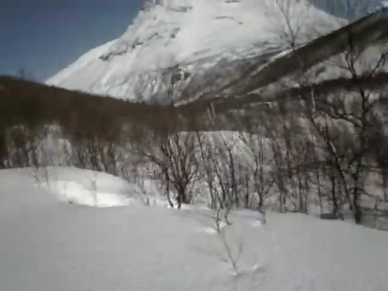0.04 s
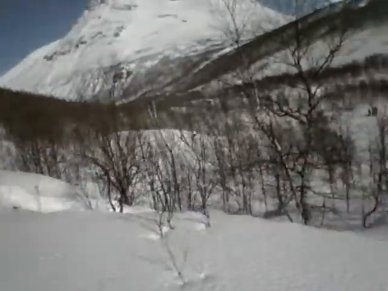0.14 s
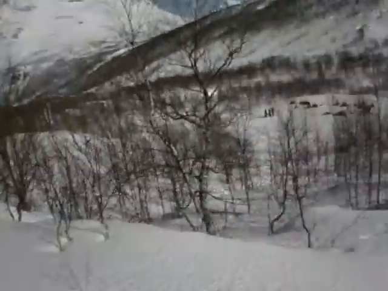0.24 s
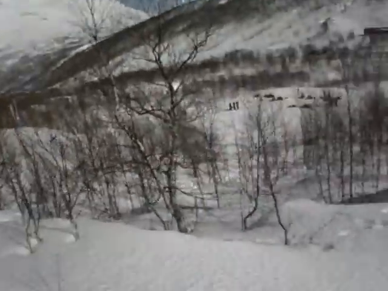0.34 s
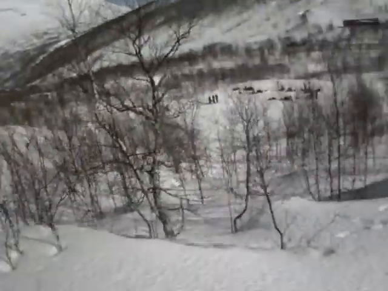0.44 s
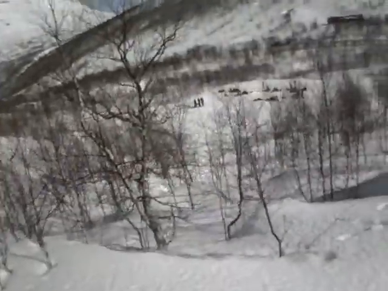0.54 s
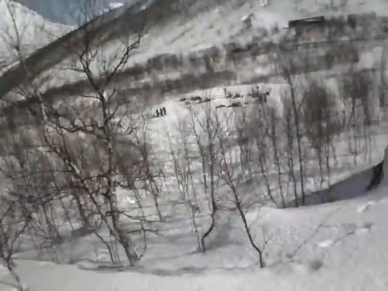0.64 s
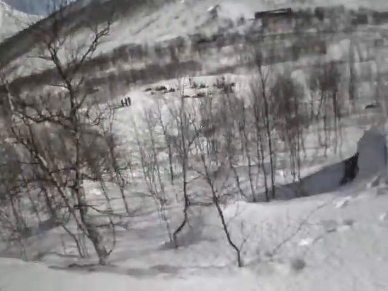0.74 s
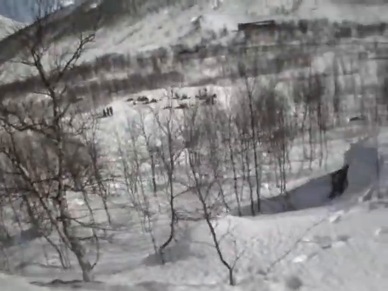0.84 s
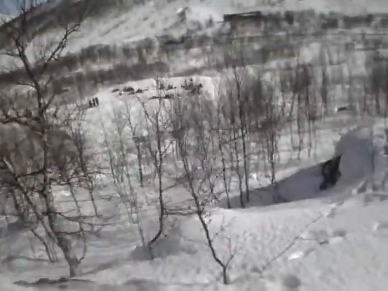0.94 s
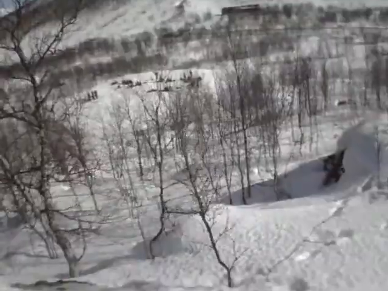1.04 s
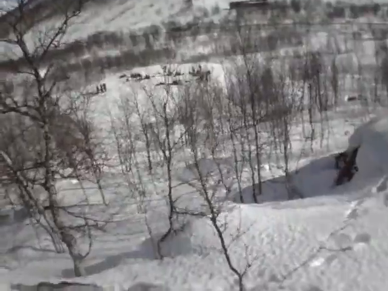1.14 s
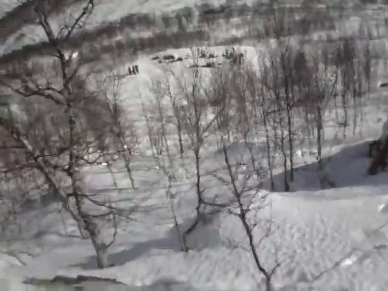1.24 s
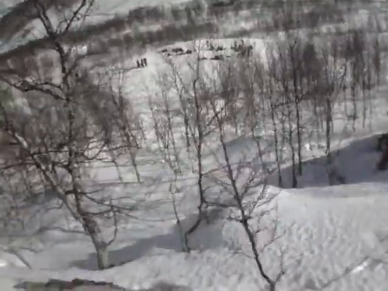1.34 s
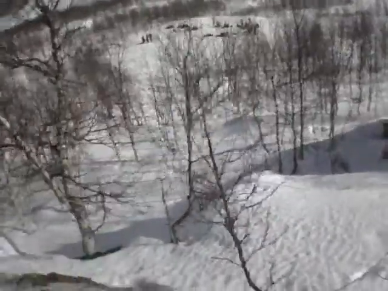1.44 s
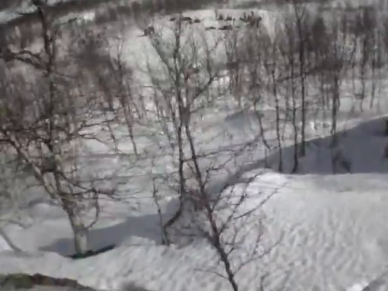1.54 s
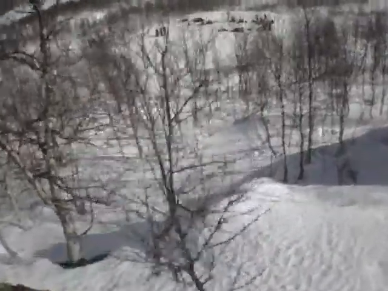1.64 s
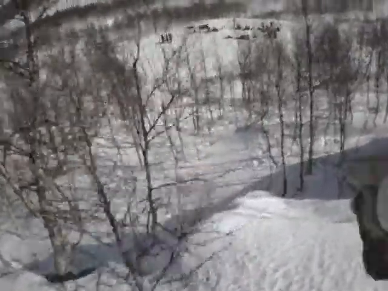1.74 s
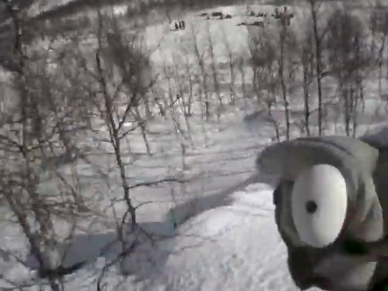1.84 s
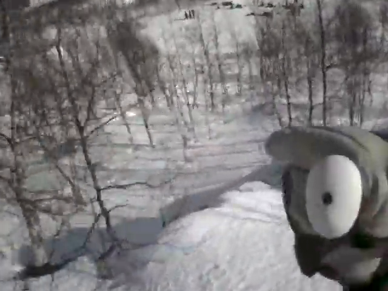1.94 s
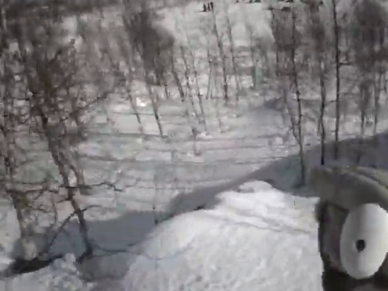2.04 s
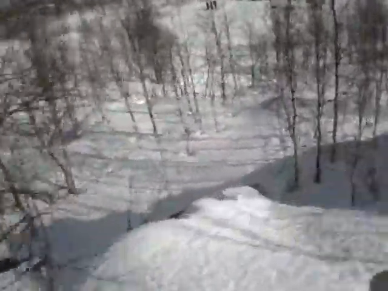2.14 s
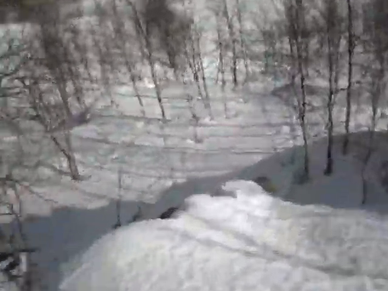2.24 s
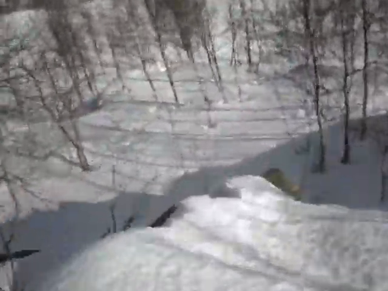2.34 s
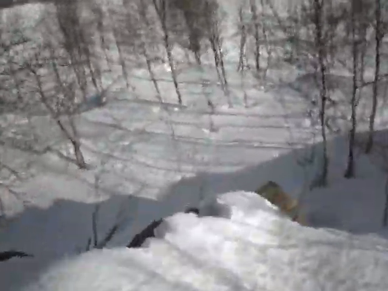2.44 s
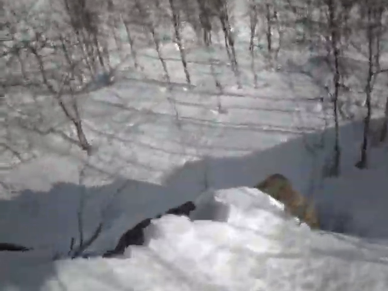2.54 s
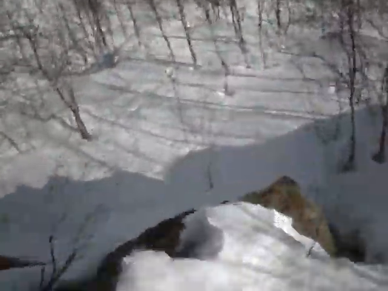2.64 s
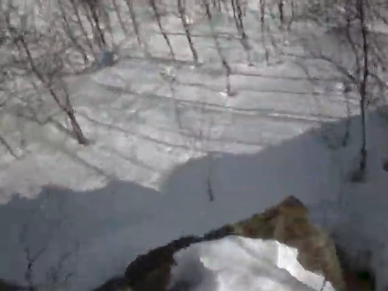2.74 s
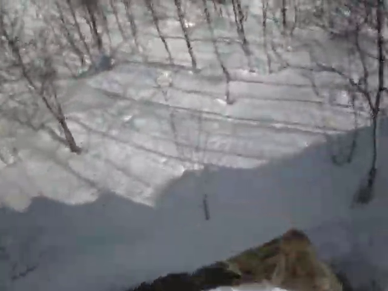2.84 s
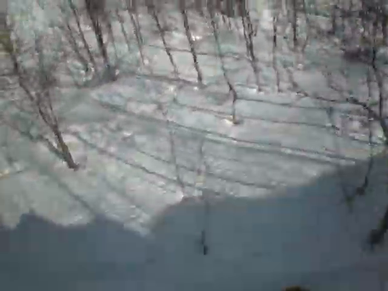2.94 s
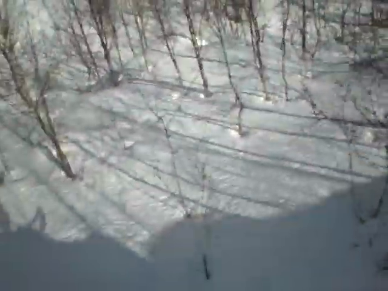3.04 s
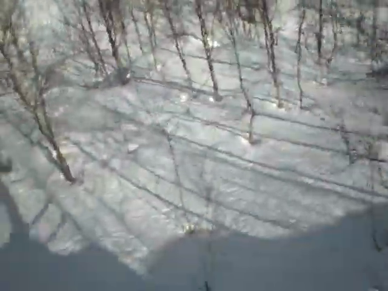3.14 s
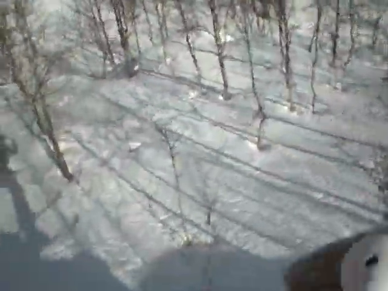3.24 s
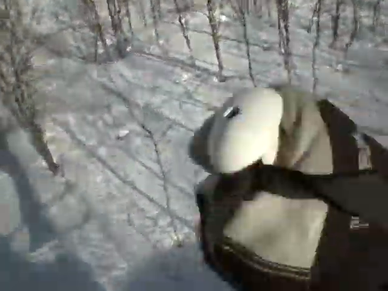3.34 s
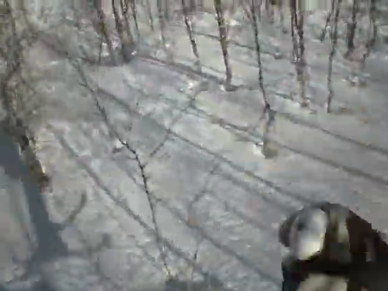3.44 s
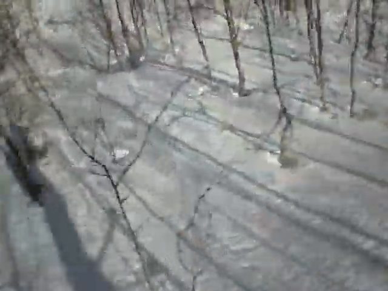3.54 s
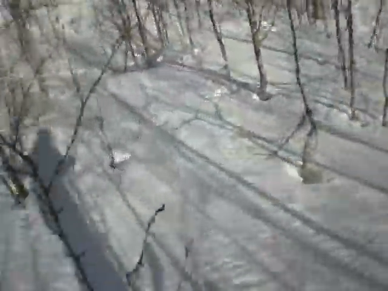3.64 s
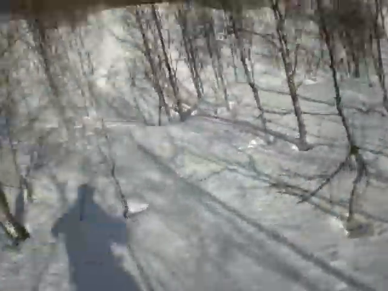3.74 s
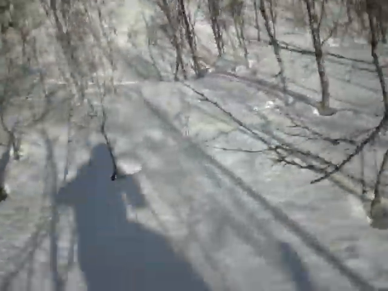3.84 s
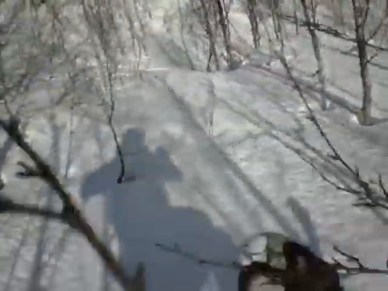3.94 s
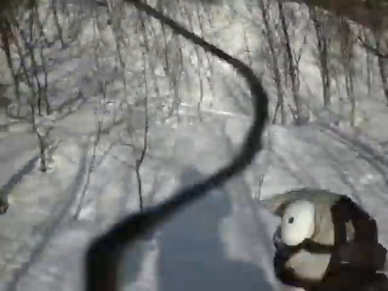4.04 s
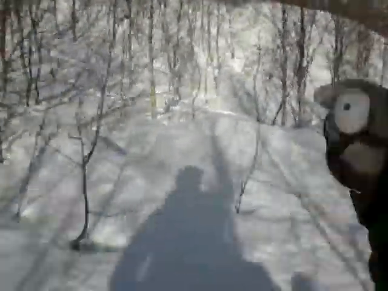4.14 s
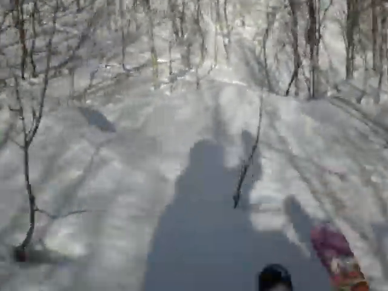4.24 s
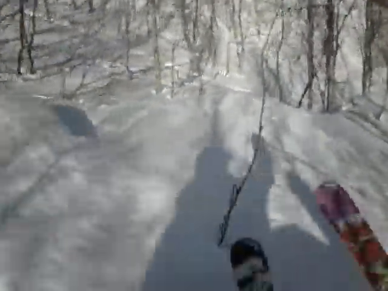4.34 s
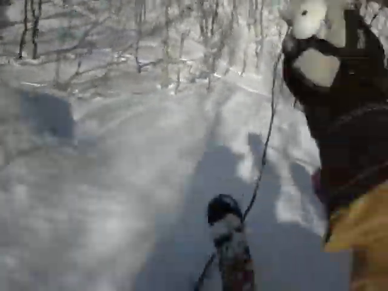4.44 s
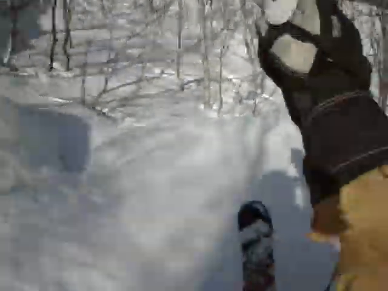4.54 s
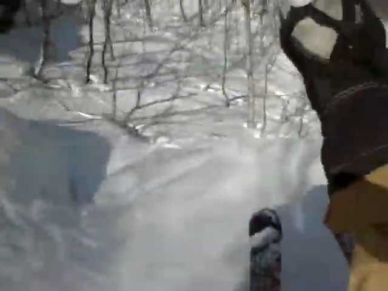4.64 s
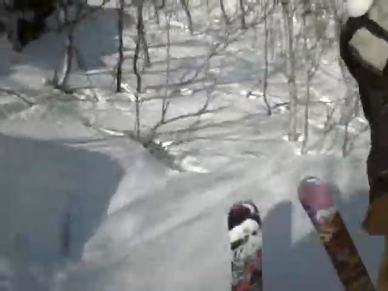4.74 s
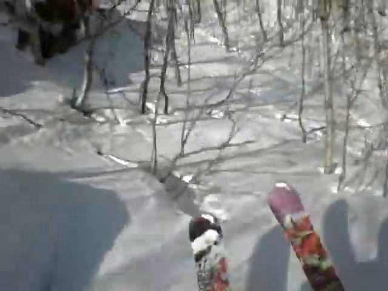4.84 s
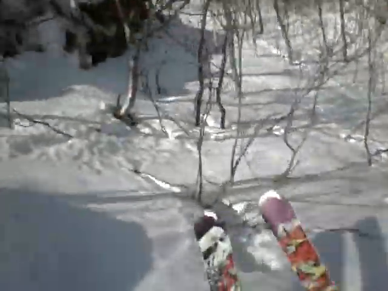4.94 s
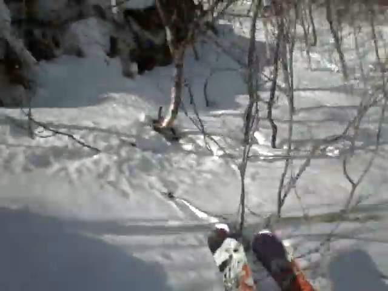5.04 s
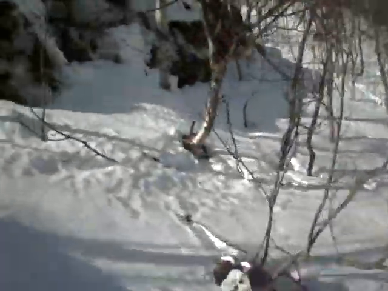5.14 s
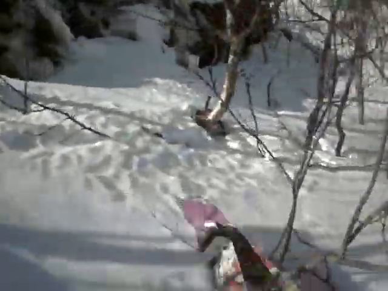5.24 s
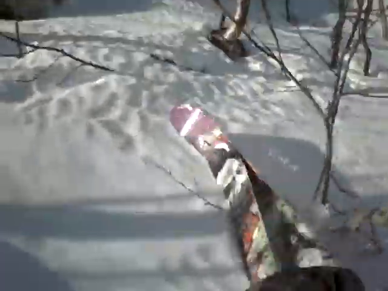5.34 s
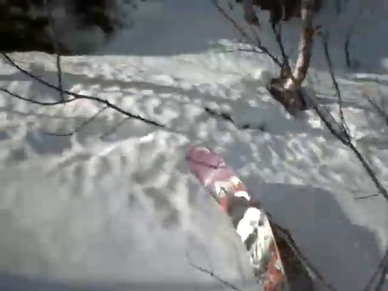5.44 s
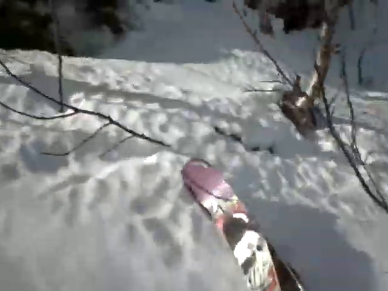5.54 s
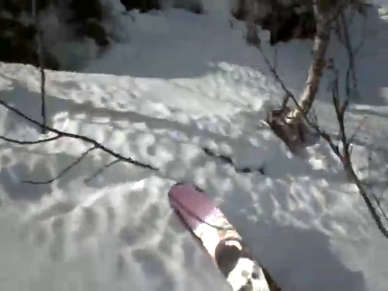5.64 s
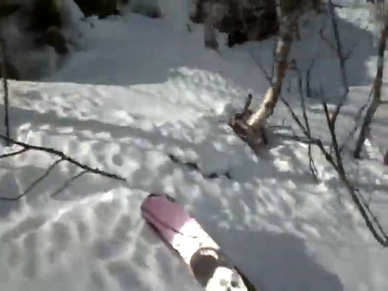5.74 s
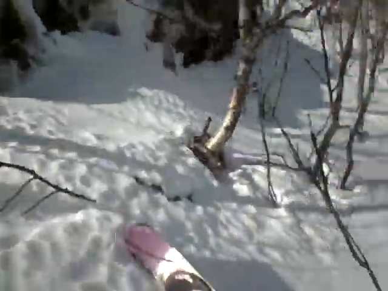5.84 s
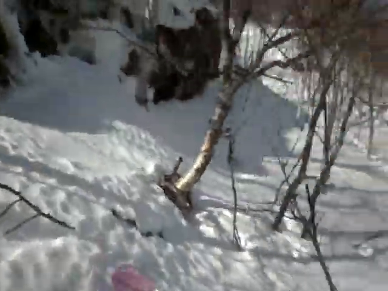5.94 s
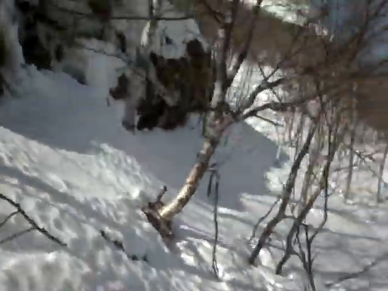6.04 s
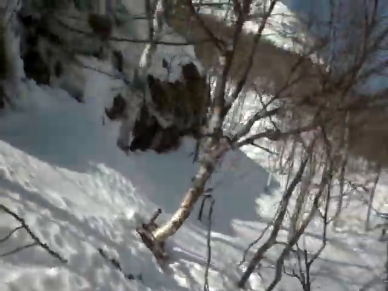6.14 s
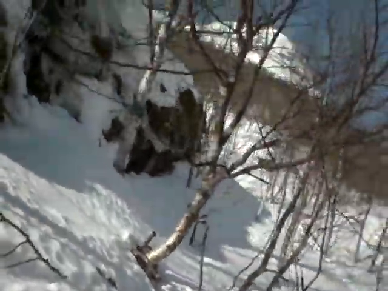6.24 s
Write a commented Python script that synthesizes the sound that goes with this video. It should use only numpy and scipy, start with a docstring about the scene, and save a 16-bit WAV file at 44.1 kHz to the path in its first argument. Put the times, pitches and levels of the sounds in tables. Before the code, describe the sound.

On a snowy slope, a helmet microphone picks up the dull swish and crunch of skis, low wind and small knocks. Speed builds, the edges scrape over a firm lip, and the wind swells into harsh buffeting. The skier slams into the snow, distorting the sound as bindings and edges clack. The skis skid through packing snow and slow to a crawl after one more loud clack.

```python
"""Skis hiss and groan through deep powder as bumps knock the helmet and the gear clacks.
The skier grinds over the lip of a drop off a rock, lands hard and skids to a crawl.
Snow groans as it packs and hisses as it is thrown; wind buffets the closed helmet camera case.
The case muffles all treble; the landing and the strongest gusts overload the microphone."""
import sys
import numpy as np
from scipy import signal
from scipy.fft import rfft, irfft, next_fast_len
from scipy.io import wavfile
from scipy.ndimage import uniform_filter1d, map_coordinates

SR = 44100
rng = np.random.default_rng(int(sys.argv[2]) if len(sys.argv) > 2 else 0)


def wrap_up_sound(samples):
    """Save the sound to the file named by the first command line argument, as 16-bit audio."""
    columns = np.atleast_2d(samples).T
    # keep every value between -1 and 1, then stretch to whole-number steps
    tamed = np.clip(columns, -1, 1)
    steps = np.round(tamed * 32767).astype(np.int16)
    wavfile.write(sys.argv[1], SR, steps)


N = 276934


def amp(db):
    """Decibels to gain."""
    return 10 ** (np.asarray(db) / 20)


def unit(x):
    """Scale to rms 1."""
    return x / np.sqrt(np.mean(x ** 2) + 1e-20)


def curve(rows):
    """One value per sample from (seconds, value) rows."""
    return np.interp(np.arange(N) / SR, *np.transpose(rows))


def wobble(rate):
    """A smooth random curve, rate knots a second."""
    return map_coordinates(rng.standard_normal(int(N * rate / SR) + 4), [np.arange(N) * rate / SR])


def swell(start, length, attack_s, release_t60, arch_db):
    """Envelope of one push: it rises, holds in an arch arch_db lower at both ends, and dies away."""
    t = np.arange(N) / SR - start
    arch = (2 * np.clip(t / length, 0, 1) - 1) ** 2
    release_db = 60 * np.maximum(t - length, 0) / release_t60
    return np.clip(t / attack_s, 0, 1) * amp(-arch_db * arch - release_db)


def filtered(x, response):
    """x through a complex frequency response."""
    size = next_fast_len(len(x) + 8192)
    return irfft(rfft(x, size) * response(np.fft.rfftfreq(size, 1 / SR)), size)[:len(x)]


def eq(x, points):
    """x through (Hz, dB) points joined on a log axis."""
    f, db = np.transpose(points)
    return filtered(x, lambda hz: amp(np.interp(np.log(hz + 1), np.log(f), db)))


def noise(points):
    """Noise at rms 1, coloured by an EQ curve."""
    return unit(eq(rng.standard_normal(N), points))


def add(track, start, sound):
    """Mix a sound into the track at start seconds."""
    part = track[round(start * SR):][:len(sound)]
    part += sound[:len(part)]


def crunch(rate, spread_db, share):
    """Crystals collapse: tiny uneven fractures carry this share of the power, sliding noise the rest."""
    fractures = (rng.random(N) < rate / SR) * rng.choice([-1, 1], N)
    sizes = amp(spread_db * np.clip(rng.standard_normal(N), -2, 2))
    return np.sqrt(share) * unit(fractures * sizes) + np.sqrt(1 - share) * rng.standard_normal(N)


def swish(x, depth_db):
    """Patches a few hundred Hz wide and a few hundredths of a second long swell and sink."""
    spectrum = signal.stft(x, nperseg=512)[2]
    patches = uniform_filter1d(rng.standard_normal(spectrum.shape), size=4, axis=0)
    patches = uniform_filter1d(patches, size=6, axis=1)
    return signal.istft(spectrum * amp(depth_db * unit(patches)), nperseg=512)[1][:N]


# Weight on the gliding skis. Each row: time in seconds, level of the packing snow in dB.
SKI_LOAD = [(0, -32), (.22, -31), (.6, -25), (.82, -23), (1.05, -26.5), (1.25, -18.5), (1.5, -32.5),
            (1.8, -30.5), (1.96, -19), (2.5, -18.5), (2.7, -28), (3.2, -25), (3.52, -12), (3.95, -18),
            (4.25, -12), (4.65, -18.5), (5.3, -16.5), (5.6, -26.5), (6.28, -28)]
# Airflow rises with speed and drives both hiss and wind. Each row: time in seconds, level in dB.
AIRSPEED = [(0, -47), (.42, -40.5), (.68, -30.5), (1.03, -42), (1.27, -30.5), (1.55, -33), (1.86, -31),
            (2.0, -22.5), (2.3, -19.5), (2.52, -32.5), (2.83, -25.5), (3.38, -19), (3.6, -14.5),
            (4.93, -15.5), (5.06, -19.5), (5.35, -20.5), (5.56, -33), (6.28, -34.5)]
# Edges dig in for turns and skids. Each row: start, length and attack in seconds,
# added packing in dB, added thrown snow in dB.
TURNS = [(0.246, 0.031, 0.0061, -29.5, -33), (0.572, 0.21, .05, -30, -33),
         (1.134, 0.35, 0.028, -29.5, -28.5), (2.135, .44, 0.21, -23.5, -18),
         (2.752, 0.066, 0.053, -36, -25.5), (3.698, 0.11, .012, -13.5, -21.5),
         (4.01, 0.16, 0.054, -13, -12.5), (4.289, .17, 0.044, -18.5, -17), (4.74, 0.43, 0.035, -23, -25.5),
         (5.062, 0.21, 0.1, -8.5, -18), (5.322, 0.27, .04, -28.5, -26), (5.769, 0.11, 0.04, -25.5, -25),
         (6.069, 0.37, .03, -39, -31)]
# The skis leave the snow. Each row: start, length and lift-off time in seconds, dip of the hiss in dB.
AIRTIME = [(3.235, 0.22, 0.087, 18.5), (3.453, 0.22, 0.032, 12), (3.869, 0.08, .04, 4),
           (5.665, .035, .008, 13.5)]


def ski_envelopes(glide_db=-32, cruise_db=-25, hiss_growth=0.39, settle_t60=0.096, packing_dip=0.36):
    """Packing follows the load and thrown snow the speed; turns push both up, hops duck both."""
    pack_power = amp(curve(SKI_LOAD)) ** 2
    throw_power = amp(glide_db + hiss_growth * (curve(AIRSPEED) - cruise_db)) ** 2
    for start, length, attack_s, pack_db, throw_db in TURNS:
        edge = swell(start, length, attack_s, release_t60=0.5, arch_db=2.5)
        pack_power += (amp(pack_db) * edge) ** 2
        throw_power += (amp(throw_db) * edge) ** 2
    dip_db = sum(db * swell(start, length, lift_s, settle_t60, arch_db=0)
                 for start, length, lift_s, db in AIRTIME)
    return np.sqrt(pack_power) * amp(-packing_dip * dip_db), np.sqrt(throw_power) * amp(-dip_db)


# The four colours of snow. Each row: frequency in Hz, relative level in dB.
GROAN_EQ = [(60, -26), (170, -6.5), (300, -4), (430, -0.5), (550, 1.5), (660, -1.5), (800, -9), (1000, -16),
            (1120, -22.5), (1260, -18), (1600, -25), (2500, -36), (4000, -46.5)]  # powder packing down
LIP_EQ = [(400, -23.5), (650, 9.5), (780, 0.5), (970, 5), (1100, -21), (2000, -30.5)]  # edges on the firm lip of the drop
SPRAY_EQ = [(500, -31.5), (1100, -17.5), (1300, -12.5), (1680, -8), (2000, 0), (2300, 0), (2520, 1),
            (2720, 1), (2900, 2), (3220, -8.5), (3550, -13), (4300, -18)]  # thrown powder
CRUST_EQ = [(800, -12.5), (1400, -15.5), (1550, -18), (1800, 0.5), (2200, -4), (3000, -0.5), (3500, 0.5),
            (4200, -4)]  # coarse crust scraping the skis
# How much crust is in the hiss. Each row: time in seconds, level against the spray in dB.
CRUST_MIX = [(0, -1), (.3, -13.5), (1.4, -15), (1.7, -3), (2.3, -1.5), (2.7, -7.5), (3.5, -7), (5.5, 3),
             (6.28, -5)]


def snow():
    """Powder groans and sprays and crust rasps, all shaken by ski chatter; the lip grinds once."""
    pack, throw = ski_envelopes()
    lip = amp(-23.5) * swell(start=2.21, length=0.39, attack_s=0.029, release_t60=0.052, arch_db=-1.5)
    chatter = wobble(55)
    groan = eq(crunch(rate=700, spread_db=1.0, share=0.24), GROAN_EQ) * amp(1.9 * chatter)
    grind = eq(crunch(rate=470, spread_db=-3.0, share=0.66), LIP_EQ)
    spray = swish(eq(crunch(rate=1100, spread_db=5.5, share=0.6), SPRAY_EQ), depth_db=2.0)
    rasp = swish(eq(crunch(rate=400, spread_db=2.0, share=0.49), CRUST_EQ), depth_db=2.5)
    hiss = (unit(spray) + amp(curve(CRUST_MIX)) * unit(rasp)) * amp(1.2 * chatter)
    return pack * unit(groan) + lip * unit(grind) + throw * hiss


# Wind on the case, deep and harsh. Each row: frequency in Hz, relative level in dB.
RUMBLE_EQ = [(10, -13), (30, -1), (60, -2.5), (110, -3.5), (160, -5), (300, -10), (550, -15), (1000, -45),
             (2000, -54.5), (4000, -52)]
FLUTTER_EQ = [(100, -0.5), (400, 8.5), (700, -0.5), (1100, -16.5), (2000, -36.5), (4000, -29.5)]
# Single gusts on top of the airflow. Each row: start in seconds, length in seconds, strength in dB.
WIND_GUSTS = [(1.359, 0.051, -25.5), (1.904, 0.13, -18.5), (2.277, 0.17, -21), (3.442, 0.12, -8),
              (3.725, 0.055, -8.5), (4.128, 0.097, -6.5), (4.551, .08, -13.5), (4.711, 0.032, -13)]


def wind(gale_db=-10, flutter_db=-22, flutter_growth=1.7):
    """Gusts and eddies tumble over the case; a harsh flutter grows faster than the rumble."""
    gust_power = sum((amp(db) * swell(start, length, attack_s=0.018, release_t60=0.19, arch_db=3.5)) ** 2
                     for start, length, db in WIND_GUSTS)
    eddies_db = 0.85 * wobble(24)
    buffet_db = 10 * np.log10(amp(curve(AIRSPEED)) ** 2 + gust_power) + eddies_db
    rumble = amp(buffet_db + 1.67) * noise(RUMBLE_EQ)
    flutter = amp(flutter_db + flutter_growth * (buffet_db - gale_db)) * noise(FLUTTER_EQ)
    return rumble + flutter


# The hollow tone of helmet and case. Each row: centre in Hz, width in Hz, relative level in dB.
HELMET_MODES = [(367, 250, -3), (580, 101, 7), (745, 140, 0), (1560, 310, -10), (2560, 1300, -25.5)]


def helmet(x):
    """Helmet and camera case colour a knock with broad resonances of alternating polarity."""
    return filtered(x, lambda f: sum(
        (-1) ** k * amp(db) * 1j * f * width / (centre ** 2 - f ** 2 + 1j * f * width)
        for k, (centre, width, db) in enumerate(HELMET_MODES)))


# Jolts through skis and boots. Each row: start in seconds, peak level in dB, low-pass cutoff in Hz.
JOLTS = [(.054, -9, 3000), (.114, -20, 900), (.162, -19, 2500), (.534, -20, 900), (.628, -9, 2500),
         (.701, -7, 1200), (.872, -17, 600), (2.352, -3, 700), (2.872, -12, 3000), (3.133, -13, 4000),
         (3.558, -3, 1200), (3.577, -2, 2000), (3.759, 3, 1000), (4.893, -3, 1500), (5.514, -9, 1500),
         (5.637, -14, 1500), (5.981, -15, 1000)]


def bumps(crumble_t60=0.01, crumble_gain=0.19):
    """A push and a brief crumble travel up the body and knock the helmet; soft bumps are dull."""
    track, t = np.zeros(N), np.arange(SR // 10) / SR
    for start, db, cutoff_hz in JOLTS:
        jolt = crumble_gain * rng.standard_normal(len(t)) * amp(-60 * t / crumble_t60)
        jolt[0] += 2  # the push
        knock = filtered(helmet(jolt), lambda hz: 1 / (1 + 1j * hz / cutoff_hz))
        add(track, start, amp(db) * knock / np.abs(knock).max())
    return track


# Gear hits. Each row: start in seconds, peak of the crack in dB, ring against the crack in dB.
GEAR_HITS = [(.272, -22, -12), (.626, -19, -14), (3.134, -9, -18), (3.263, -18, -16), (3.399, -21, -14),
             (3.408, -20, -14), (3.605, -7, -18), (3.793, -4, -18), (3.818, -6, -18), (3.945, -10, -14),
             (4.006, 7, -24), (4.073, 3, -10), (4.085, 7, -12), (4.173, 2, -12), (4.455, 1, -14),
             (4.728, 4, -14), (4.740, -5, 4), (5.378, 7, -24)]
# The bright snap of a hit. Each row: frequency in Hz, relative level in dB.
CRACK_EQ = [(200, -25), (600, -11), (1200, -5.5), (2000, 6), (2800, 7), (3900, -12), (4500, 12.5),
            (7000, -25)]
# The camera case rings. Each row: pitch in Hz, relative level in dB, seconds to fade by 60 dB.
CASE_RING_MODES = [(2530, -1, .2), (2810, 0, .14), (3047, -2, .1), (3461, -4, .04), (3815, 2, .09),
                   (4188, 1, .07)]


def clacks(crack_t60=0.014):
    """Hard gear strikes together: a dry crack and the short ring of the camera case it sets off."""
    track, t = np.zeros(N), np.arange(SR // 4) / SR
    for start, db, ring_db in GEAR_HITS:
        crack = eq(rng.standard_normal(len(t)), CRACK_EQ) * amp(-60 * t / crack_t60)
        ring = np.zeros(len(t))
        for hz, mode_db, t60 in CASE_RING_MODES:
            decay = amp(mode_db + rng.normal(0, 1.8) - 60 * t / t60)
            ring += decay * np.sin(2 * np.pi * (hz * t + rng.random()))
        clack = crack / np.abs(crack).max() + amp(ring_db) * ring / np.abs(ring).max()
        add(track, start, amp(db) * clack)
    return track


# Skis slam into the snow. Each row: start in seconds, hold in seconds, level in dB.
LANDINGS = [(4.033, .085, -0.5), (4.138, 0.046, -1.5), (4.199, 0.028, 0), (4.716, 0.018, -0.5),
            (5.154, 0.094, -25)]
# The roar of crushed snow. Each row: frequency in Hz, relative level in dB.
ROAR_EQ = [(150, -16.5), (350, 0), (520, 3.5), (740, 3.5), (1000, -10), (1600, -7), (2800, -25.5),
           (4000, -26)]


def slams(attack_s=0.0005, release_t60=0.041, thud_db=-10):
    """The skier's weight crushes the snow: a roar over a thud as deep as the wind's rumble."""
    force = sum(amp(db) * swell(start, hold, attack_s, release_t60, arch_db=0)
                for start, hold, db in LANDINGS)
    return force * (noise(ROAR_EQ) + amp(thud_db) * noise(RUMBLE_EQ))


def scene():
    """Wind, snow and gear, all at the one microphone."""
    return (wind() + snow() + bumps() + clacks() + slams())[None]


# Treble loss before and after the overload. Each row: frequency in Hz, gain in dB.
CASE_EQ = [(3750, 0.5), (4050, -5), (4350, -15), (4650, -42.5), (5100, -69.5)]
OUTPUT_EQ = [(3800, 0), (5200, -9), (9000, -4), (15000, -7.5)]


def record(dry, ceiling=0.71, hardness=40, top_hz=15900):
    """The case muffles the treble; overload flattens the peaks, which alone spit above that band."""
    muffled = eq(dry[0], CASE_EQ)
    clipped = muffled / (1 + np.abs(muffled / ceiling) ** hardness) ** (1 / hardness)
    return filtered(eq(clipped, OUTPUT_EQ), lambda hz: hz < top_hz)[None]


dry = scene()
out = record(dry)
wrap_up_sound(out)
```